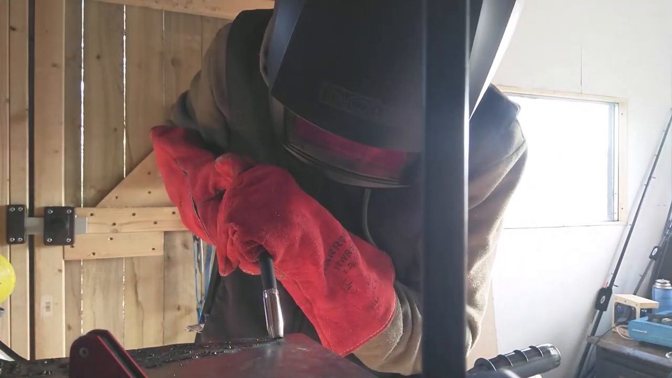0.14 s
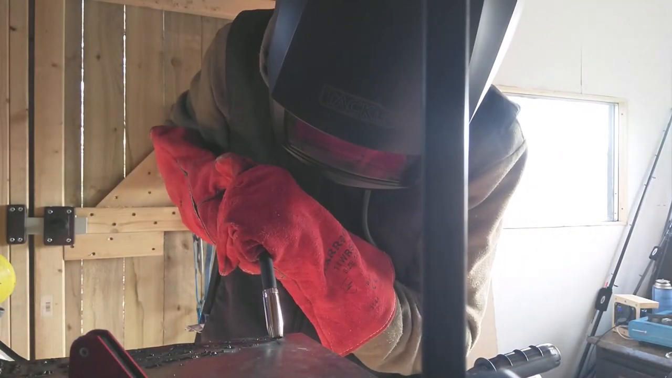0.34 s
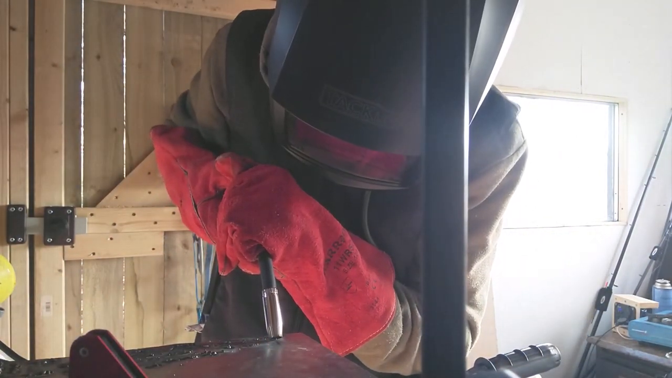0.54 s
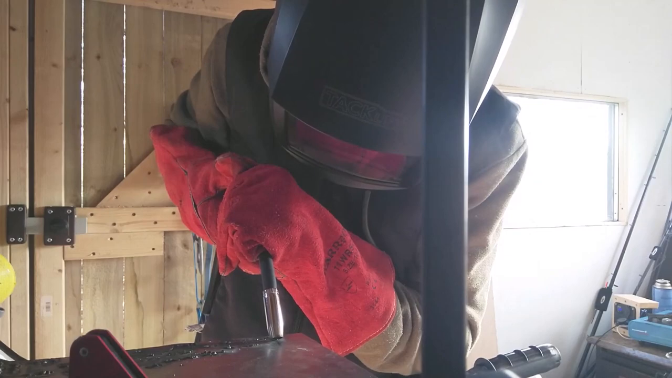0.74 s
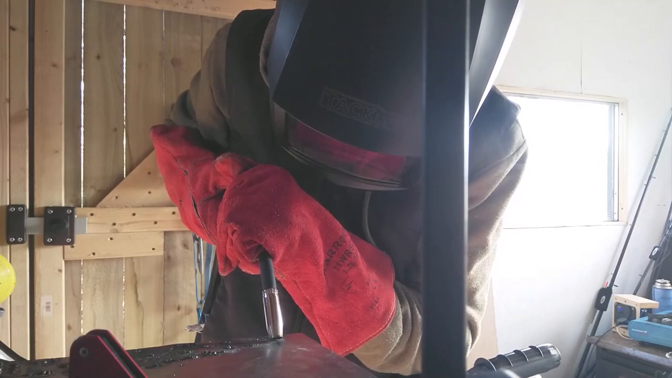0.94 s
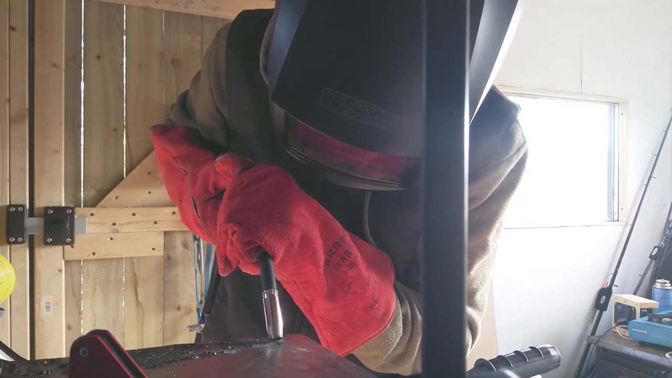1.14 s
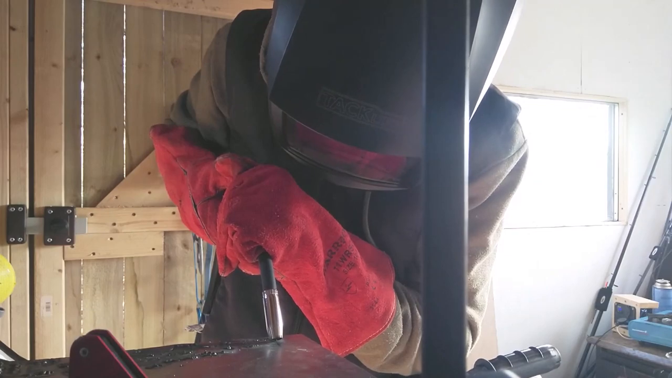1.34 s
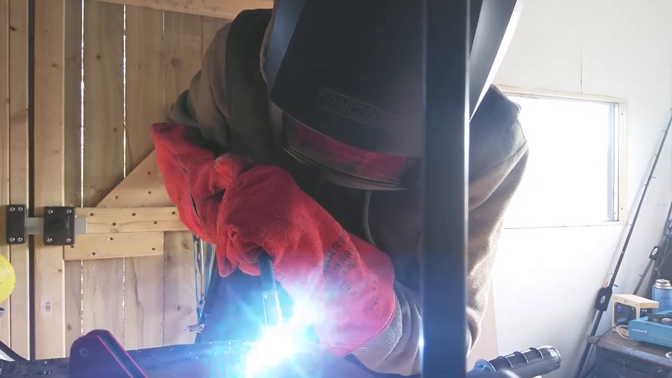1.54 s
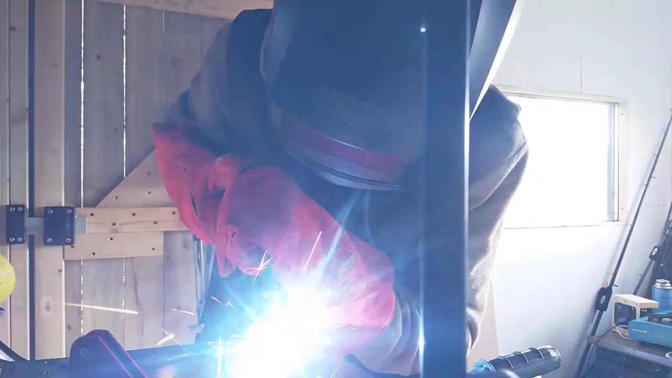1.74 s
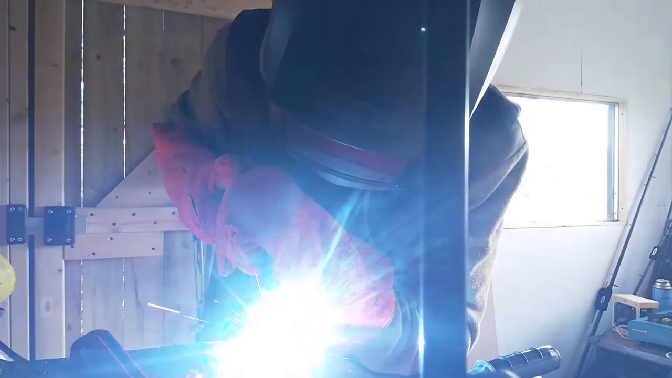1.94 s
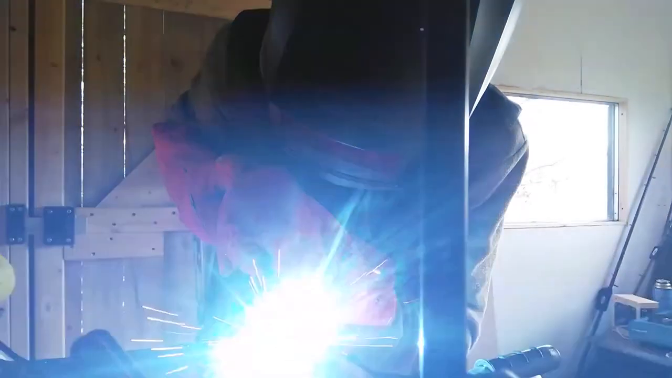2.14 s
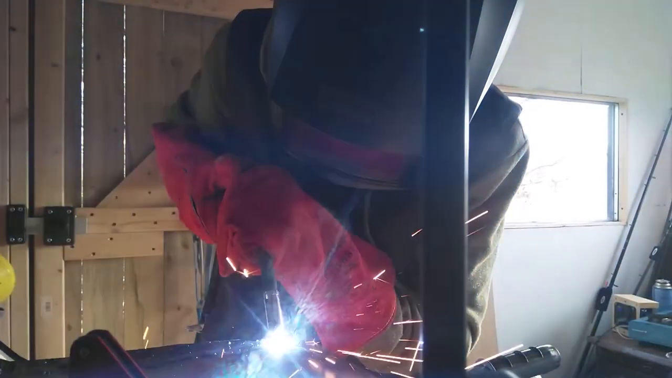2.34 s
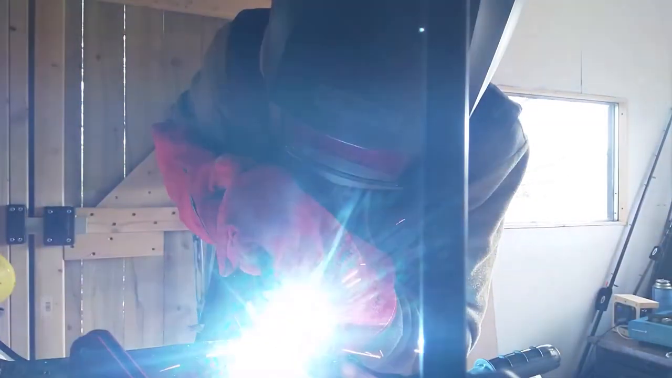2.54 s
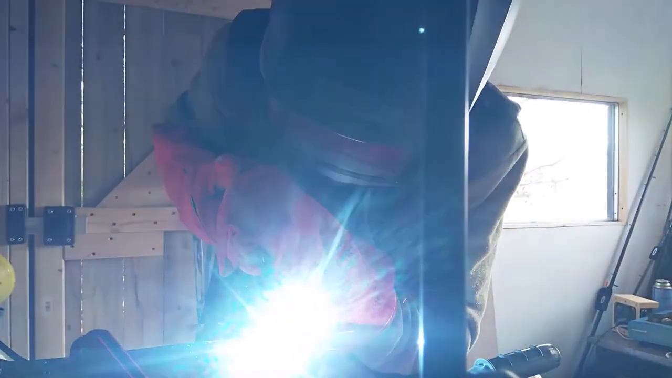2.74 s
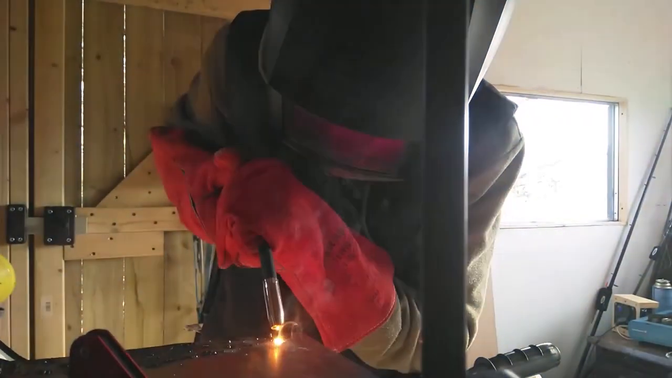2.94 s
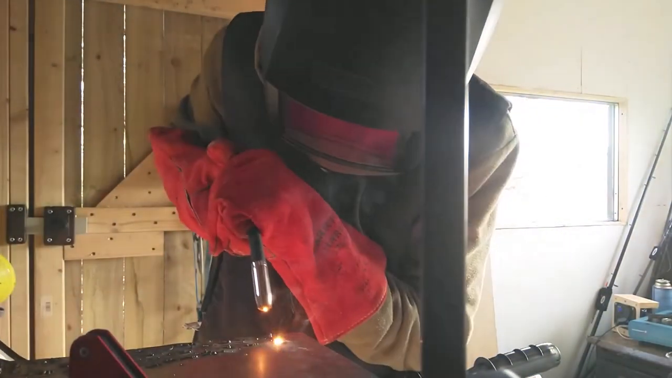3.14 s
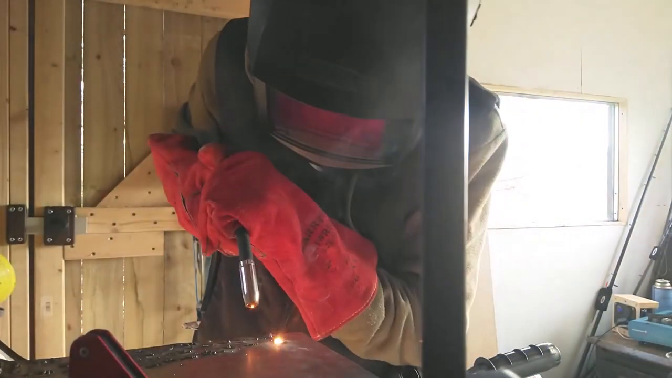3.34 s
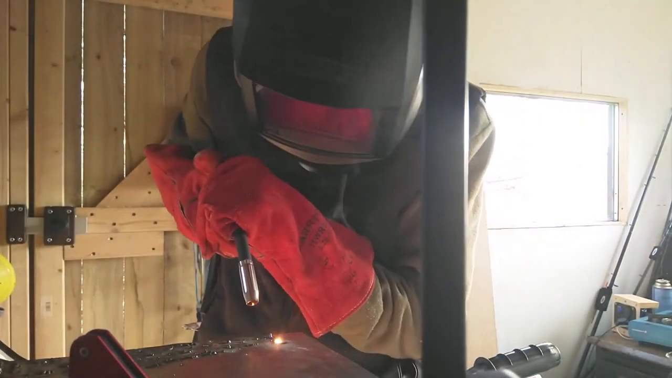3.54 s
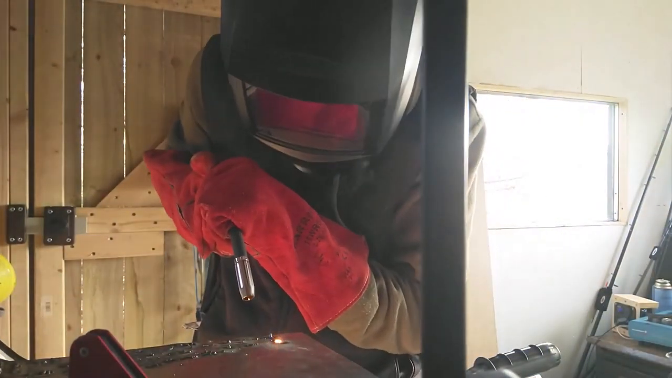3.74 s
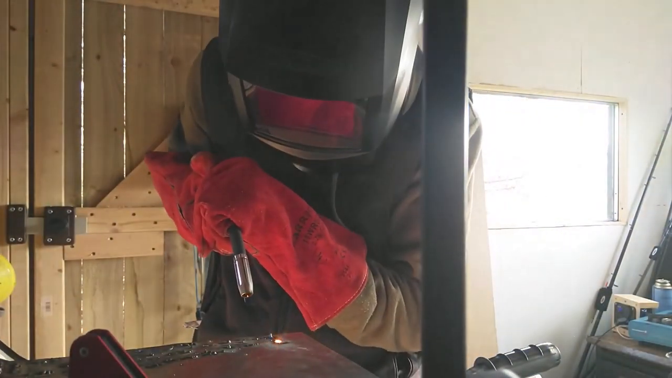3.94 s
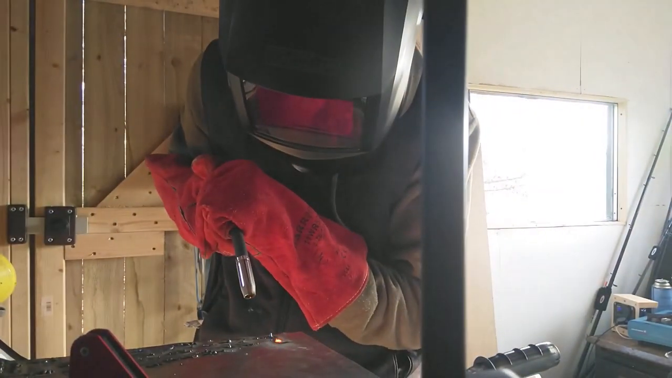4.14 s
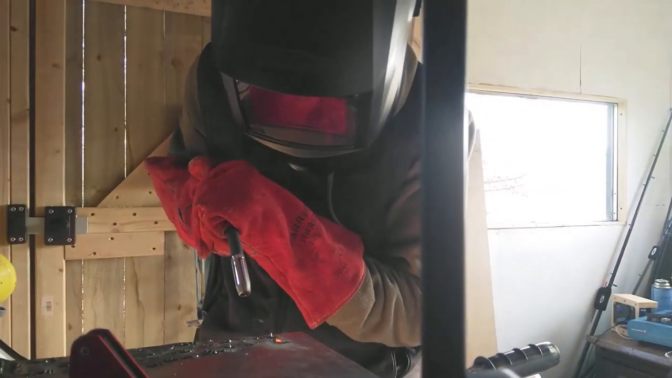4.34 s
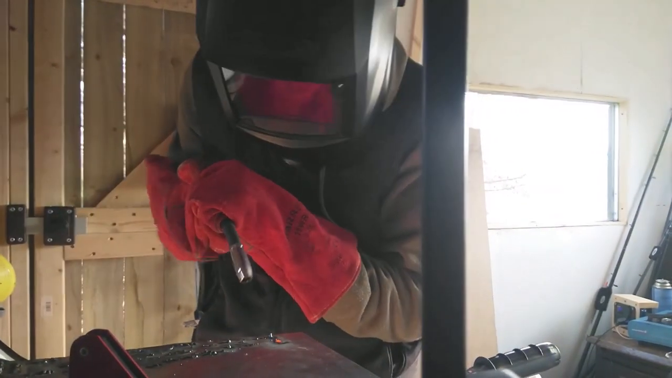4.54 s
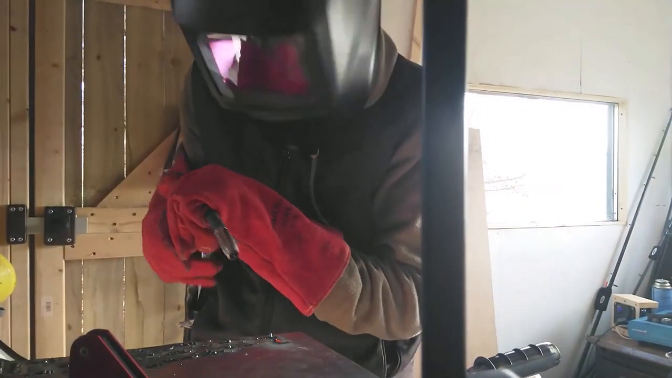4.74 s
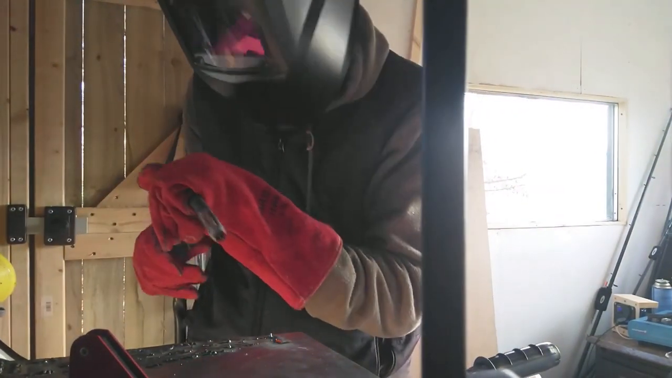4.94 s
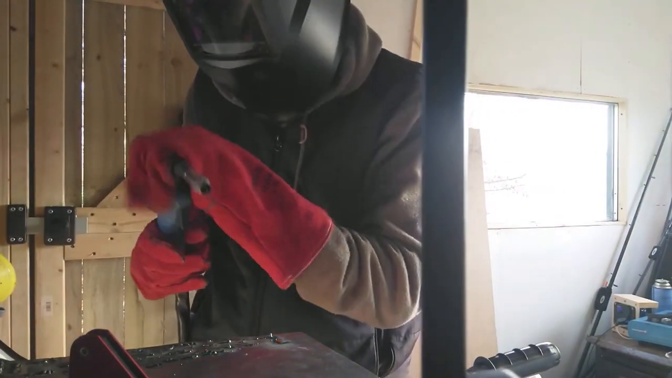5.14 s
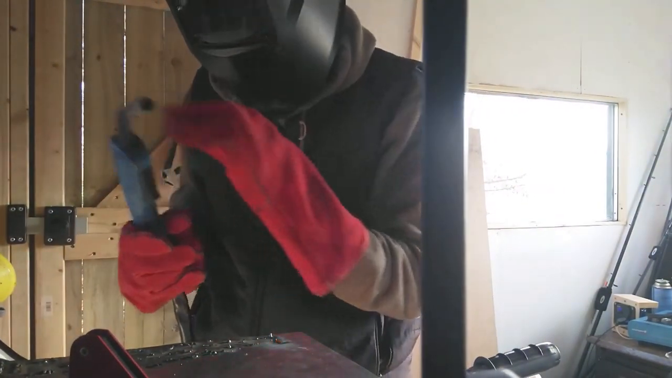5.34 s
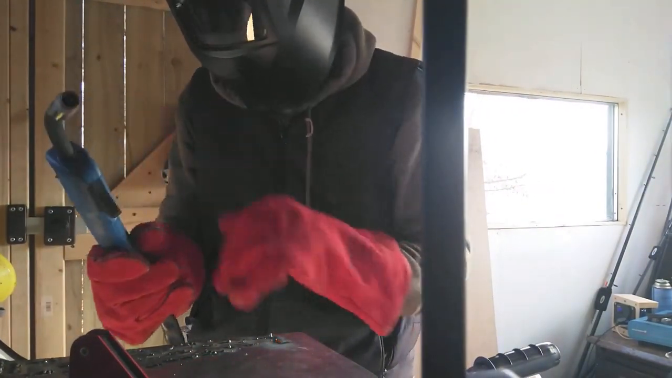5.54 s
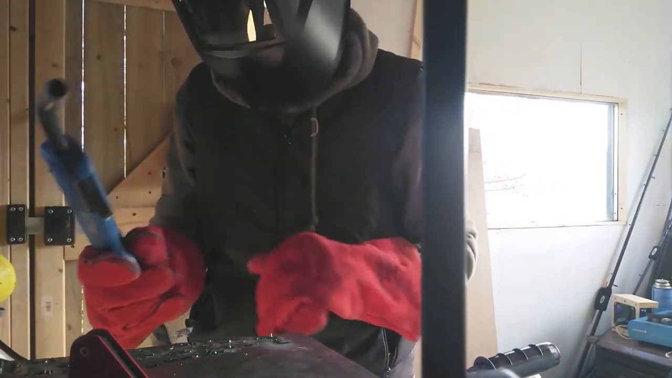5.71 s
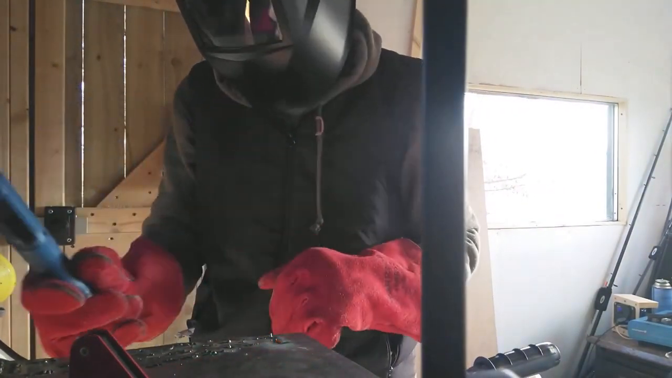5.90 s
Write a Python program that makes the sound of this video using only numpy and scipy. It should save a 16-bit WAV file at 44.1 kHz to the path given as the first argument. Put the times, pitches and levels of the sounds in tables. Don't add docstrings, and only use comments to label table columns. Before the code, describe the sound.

Near-silent room tone with low floor rumble and faint hiss; light, dull metallic taps come first. After a small plastic click, a wire-feed welder spits bright, dense, ragged crackle with hard pops, far louder than everything else and slightly different left and right. It cuts off into a brief small-room decay. A tiny click and soft knock follow, then quiet, then subdued leather rubbing and cloth swishes as the welder moves.

```python
import sys
import numpy as np
from scipy import signal
from scipy.fft import rfft, irfft
from scipy.io import wavfile

SR = 44100
rng = np.random.default_rng(int(sys.argv[2]) if len(sys.argv) > 2 else 0)


def magnitude_from_level(level_db):
    exponent = np.asarray(level_db, float) / 20
    return 10 ** exponent


def generate_wav(signal):
    frames = np.transpose(np.atleast_2d(signal))
    scaled = np.clip(frames, -1, 1) * 32767
    pcm = np.round(scaled).astype(np.int16)
    wavfile.write(sys.argv[1], SR, pcm)


N = 263277
HZ = np.maximum(np.arange(N // 2 + 1) * SR / N, 1)

# [t/s, peak level/dB]
FIRST_SPARKS = [
    (1.596, -49),
    (1.604, -41.5),
    (1.608, -40.5),
    (1.617, -39),
    (1.622, -35.5),
    (1.629, -22),
    (1.636, -27),
]
# [t/s,
# level/dB]
FLARES = [(1.6539, -17), (1.6629, -15), (1.7126, -17), (1.7251, -12), (1.7435, -14.5), (1.7611, -22),
          (1.7814, -25.5), (1.7935, -17.4), (1.815, -20), (1.8387, -27), (1.8434, -20.1),
          (1.8532, -17), (1.8644, -15), (1.8775, -13), (1.8949, -16), (1.911, -19), (1.9225, -16),
          (1.9332, -19), (1.9444, -13.5), (1.9543, -13), (1.9642, -15), (1.9757, -14), (1.9835, -15),
          (1.9944, -20.5), (2.014, -21), (2.0258, -18), (2.0363, -15.5), (2.0452, -14.5),
          (2.0653, -14), (2.0731, -16.5), (2.0839, -13.5), (2.0955, -11.5), (2.1127, -15.5),
          (2.1427, -14), (2.1538, -13.5), (2.1654, -16), (2.1759, -19), (2.1857, -21.5),
          (2.2051, -20.5), (2.2251, -15), (2.2341, -20), (2.2522, -18.5), (2.2622, -21.5),
          (2.2722, -23.5), (2.2836, -17), (2.2934, -23), (2.3064, -26.5), (2.3144, -24), (2.3358, -20),
               (2.345, -19.5), (2.3549, -17.5), (2.3659, -17), (2.3763, -15.5), (2.4066, -18),
               (2.4228, -23.5), (2.4339, -22), (2.462, -21), (2.4739, -21.5), (2.4869, -20.5), (2.501, -17),
               (2.5232, -19), (2.5353, -12.5), (2.5444, -15.5), (2.5557, -16.5), (2.5844, -13),
               (2.5958, -14), (2.605, -15.5), (2.6138, -17.5), (2.6341, -24.5), (2.6443, -22),
               (2.6742, -15), (2.6837, -16), (2.6936, -15.5), (2.706, -14.5), (2.7352, -15.5),
               (2.744, -19.5), (2.7537, -14), (2.7654, -16.1), (2.7759, -16.5), (2.7861, -17.5),
               (2.7939, -17), (2.8038, -19.5), (2.8263, -20.5), (2.8353, -17.5), (2.8443, -18.5),
               (2.8547, -22.5), (2.8727, -21.5), (2.8837, -24.5), (2.9046, -22.5),
          (1.674, -25.5), (1.714, -17), (1.685, -29), (1.734, -20), (1.754, -23), (1.885, -19.5),
                (1.904, -18.5), (2.004, -26), (2.055, -17), (2.104, -18), (2.124, -24.5), (2.134, -24.5),
                (2.272, -25.5), (2.415, -22), (2.565, -20.5), (2.624, -23), (2.716, -20.5), (2.815, -22.5),
                (2.915, -26)]
FLARE_DECAY_S = 0.0034
SNAP_DB, SNAP_DECAY_S = 14, 0.00025
# [t/s, level/dB]
HEAT = [
    (1.58, -62),
    (1.726, -30),
    (1.806, -39),
    (1.882, -16),
    (2.026, -29),
    (2.704, -28),
    (2.764, -15),
    (2.806, -29.5),
    (2.94, -73),
]
# [f/Hz, level/dB per Hz]
ARC_SPECTRUM = [(90, -52.5), (150, -28.5), (280, -11.5), (650, -9), (1300, -3.5), (1900, -8.5),
                (2600, -7.5), (4300, -4), (6800, -7), (8800, -4.5), (10400, -6), (12500, -5.5),
                (14300, -4.5), (15700, -4.5)]
# [f/Hz, width/Hz, level/dB]
NOTCHES = [(2200, 200, -10), (3000, 120, -5), (3620, 200, -6), (5950, 200, -10), (4050, 150, -5),
           (9380, 350, -15), (13800, 900, -24), (15080, 150, -6)]
# [f/Hz, width/Hz, level/dB]
SHEET_LEFT = [(5090, 120, 8.5), (5333, 60, 5.5), (6860, 90, 11), (7260, 60, 4.5), (7680, 210, 8),
              (8150, 200, 7), (8450, 54, 4.5), (10500, 120, 4), (11300, 90, 8), (12350, 150, 4),
              (15200, 400, 2.5)]
SHEET_RIGHT = [(4790, 180, 8.5), (5260, 150, 2.8), (5390, 60, 7), (6470, 260, 3), (7070, 70, 5),
               (8478, 80, 5), (12000, 120, 13), (12390, 80, 7.8), (15300, 200, 4)]
ROAR_DB, ROAR_FOLLOWS_HEAT, ROAR_SAG_DB_PER_S, ROAR_LINGER_S = -20.5, 0.55, 7, 0.03
WELD_START_S, WELD_END_S = 1.66, 3.12

# [t/s, right jump level/dB, early inverted left jump level/dB, left lead/ms,
# left jump level/dB]
SHORTS = [(1.6552, -0.5, -10.5, -2.5, -10), (1.6632, 0, -29.5, 0.98, 1.5), (1.7663, -1.5, -5.5, 2.3, -7),
          (1.7955, -3.5, -11, 0.4, -4), (1.8184, -4, -5.5, 2.13, -2), (1.9964, -1, -5, 1.94, -8.5),
          (2.168, -0.5, -25, 0.65, -4), (2.1872, -1.5, -24, 0.85, -5), (2.2958, -5, -45, 1.3, -11),
          (2.317, -9.5, -23, -1.3, -15), (2.338, 0, -5.5, -0.35, -7), (2.357, -2.5, -17, 0.25, -7.5),
          (2.3681, -3.5, -32, -0.2, -7.5), (2.3788, -6.5, -34, 0.9, -10.5), (2.4154, -0.9, -5.5, -.1, -6.5),
          (2.425, -9.5, -22.5, -0.2, -11), (2.436, -3.5, -2, 3.1, -7), (2.6074, -6, -26, -0.3, -9.5),
          (2.6157, -2, -24.5, -0.5, -6), (2.635, -2.5, -18.5, 0.8, -9.5), (2.6769, -5, -17.5, 0.45, -10),
          (2.6853, -11.5, -19.5, 0.6, -15.5), (2.7785, -0.7, -21, 0.5, -5.5),
          (2.7888, -8.5, -14.5, 1.2, -12), (2.7959, -3, -12, -0.15, -6.5), (2.806, -2.5, -5.5, 1.9, -10),
          (2.8465, -0.1, -14.5, 2.55, -0.6), (2.8567, -6, -10, 0.1, -12.5), (2.8742, -6.5, -13, -1.86, -13)]
# [f/Hz, width/Hz, level/dB]
BENCH = [(168, 58, -13), (221, 54, 4), (94, 62, -1.5)]
SHARED_BASS_HZ = 260

# [t/s, peak level/dB, rise/s, decay/s]
TRIGGER_PULL = [
    (1.478, -51.5, 0.004, 0.0026),
    (1.481, -37, .004, .003),
    (1.485, -27.5, 0.006, 0.0012),
    (1.49, -33.5, 0.004, 0.0022),
    (1.496, -37.5, .002, 0.0023),
    (1.567, -59, .002, .004),
]
# [t/s, peak level/dB, rise/s, decay/s]
RELAY_DROP = [
    (3.008, -46.5, 0.0059, 0.013),
]
# [t/s, peak level/dB, rise/s, decay/s]
TICKS = [
    (1.13, -72, .001, 0.0033),
    (1.226, -57.5, .0005, 0.00093),
    (4.32, -71, .001, 0.0016),
    (4.457, -60.5, 0.0015, 0.0028),
    (4.469, -65, .001, .002),
    (5.165, -62, 0.00089, 0.0035),
]
# [f/Hz, level/dB per Hz]
TRIGGER_SPECTRUM = [(410, -62.5), (700, -34), (969, -11.5), (1310, -18.5), (1720, -2), (2030, -6.5),
                    (2470, -26.5), (2780, -4), (3660, -23.5), (5400, -3.5), (7480, -16.5), (8740, -7),
                    (11000, -12.5), (12400, -11.5), (15700, -20.5)]
RELAY_SPECTRUM = [(530, -34), (900, 2), (967, -0.5), (1380, -27), (2370, -13), (3480, -17), (5040, -7.5),
                  (6180, -22), (7040, -8.5), (9060, -21), (10600, -2), (11500, -15.5), (15700, -27.5)]

# [t/s, peak level/dB, brightness/dB per octave, contact time/s,
# share of ring left by the hand/1]
KNOCKS = [(.127, -44, 1, 0.0022, .97), (.134, -40.5, 0.8, .006, 0.91), (.142, -42.5, 4, 0.0065, 0.97),
          (.153, -47.5, 3.5, 0.0034, 0.99), (.408, -64, -13, .006, .75), (.466, -65, -7, 0.0045, 0.66),
          (.578, -63, -6, 0.0035, 0.61), (.587, -65, 11, .005, 0.47), (.598, -66.5, 11.5, 0.0044, 0.45),
          (.722, -55, -7, 0.0036, 0.56), (.733, -61.5, 3.5, .004, 0.85), (.75, -55.5, -2, .004, 0.8),
          (.775, -56.5, -17, 0.0046, 0.81), (.927, -49, -9, 0.0035, .7), (.939, -57, 0, .004, 0.42),
          (3.069, -46.5, -19, 0.0025, .4), (4.543, -50, -1.5, .002, 0.35)]
# [f/Hz, level/dB, t60/s]
FRAME_MODES = [(462, 3, .11), (506, -4, .09), (700, -15, .07), (899, -3, .26), (953, -8, .15),
               (1100, -19, .05), (1443, -12, .12), (1529, -17, .12), (1715, -18, .18), (1950, -20, .1),
               (2290, -20, .12), (2360, -19, .14)]
BENCH_MODES = [(275, -11, .1), (403, -1, .13), (620, -16, .05), (1160, -22, .05)]
# [f/Hz, level/dB per Hz]
SLAP_SPECTRUM = [(120, -44), (200, -47), (467, -7.5), (789, -19), (912, 6), (1330, -29), (1490, -10),
                 (2550, -26), (4980, -22.5), (15000, -31.5)]
FRAME_PAN_DB, ROUGH_CONTACT, HIGH_MODE_LOSS_DB = 0.7, 0.5, 16

# [start t/s, end t/s, level/dB, rise/dB per s, fall/dB per s]
RUBS = [
    (4.462, 4.53, -73, 900, 300),
    (4.546, 4.68, -54, 1200, 60),
    (4.842, 4.86, -51, 220, 98),
    (4.955, 4.98, -48.5, 900, 327),
    (5.18, 5.3, -57, 500, 50),
    (5.356, 5.554, -51.5, 77.5, 59),
    (5.65, 5.97, -59, 100, 100),
    (5.0, 5.16, -71, 100, 100),
]
# [start t/s, end t/s, level/dB, rise/dB per s, fall/dB per s]
SWISHES = [
    (4.462, 4.47, -85, 1103, 60),
    (4.63, 4.72, -53.5, 132, 135),
    (4.886, 4.94, -50.5, 244, 200),
    (4.965, 4.98, -49.5, 200, 397),
    (5.27, 5.33, -57.5, 65, 300),
    (5.54, 5.56, -53, 48.5, 79),
    (5.65, 5.9, -62, 101, 72),
    (5.0, 5.16, -75, 103, 99.5),
]
# [f/Hz, level/dB per Hz]
LEATHER_SPECTRUM = [(160, -47), (280, -36.5), (302, -12.5), (506, 2), (681, -6.5), (886, 1.5), (978, -5.5),
                    (1120, 1), (1450, -15.5), (2000, -13), (2600, -24), (4400, -120)]
CLOTH_SPECTRUM = [(820, -12.5), (1400, -0.5), (1620, -8.5), (2680, -4.5), (2990, -4), (4400, -5.5),
                  (4940, -3.5), (8000, -8.5), (10400, -12.5), (17600, -120)]
SHEEN_DB, SHEEN_FOLLOWS_CLOTH = 6, 1.19

# [start t/s, end t/s, level/dB, rise/dB per s, fall/dB per s]
RUNDOWN = [
    (2.96, 3.075, -54, 196, 76),
    (3.3, 3.55, -68.5, 38, 67),
]
# [f/Hz, level/dB per Hz]
RUNDOWN_SPECTRUM = [(88, -57.5), (150, -26), (177, -17.5), (225, 2), (303, -11.5), (490, 1.5), (609, -15.5),
                    (1170, -19), (2200, -36.5), (9000, -58)]
# [t/s, rumble peak level/dB]
SHIFTS = [(.27, -54.5), (.73, -52.5), (.93, -57), (1.18, -57.5), (1.579, -52.5), (3.19, -56.5),
          (3.54, -53.5), (4.1, -60), (4.55, -56), (4.75, -50.5), (5.14, -49.5), (5.67, -52.5),
          (5.97, -61.5)]
SHIFT_DB_PER_S, RUMBLE_DB, SINK_DB, RETURN_S = 61, -58, 11, 0.049
SHAKE_DB, SHAKE_RISE_DB_PER_S, SHAKE_FALL_DB_PER_S = -33, 500, 451.5
# [f/Hz, level/dB per Hz]
RUMBLE_SPECTRUM = [(8.8, -68.5), (15, -41.5), (42, -1.5), (59, 2), (125, -8), (151, -22), (205, -21.5),
                   (228, -23), (250, -24), (320, -53.5), (550, -120)]
AIR_SPECTRUM = [(100, -41), (170, -19.5), (235, -3), (259, -7.5), (362, -6), (466, -9.5), (1030, -12),
                (3000, -23.5), (3900, -51.5), (6600, -120)]
HISS_SPECTRUM = [(880, -32), (1500, -12.5), (2220, -8.5), (2420, -6.5), (3590, -0.5), (5410, -1),
                 (7930, -4), (8840, -8.5), (15600, -10.5)]
AIR_DB, HISS_DB = -72, -74.5
# [f/Hz, correlation/1]
LIKENESS = [(60, 0.99), (180, 0.99), (550, 0.27), (1650, -0.01), (4970, -0.14), (15000, 0.072)]
# [f/Hz, t60/s]
SHED_T60 = [(100, 0.57), (500, 0.41), (2000, 0.18), (8000, 0.18), (16000, 0.25)]


def arc():
    s, db = flares()
    throb_db = 3 * np.cos(2 * np.pi * 100 * (np.arange(N) / SR - 0.006))
    sizzle = magnitude_from_level(in_time(HEAT)[0] - 9.0 + throb_db + 0.6 * drift(22))
    both = 0
    for spot, (lag, shift) in enumerate([(16, 1), (14, 0.99), (18, 1.008), (13, 0.997)]):
        spot_s, spot_db = s[spot::4], db[spot::4]
        flare = swell(spot_s, spot_db + 7.0, rise_s=0.0005, tau_s=FLARE_DECAY_S)
        snap = fade(marks(spot_s, magnitude_from_level(spot_db + SNAP_DB)), SNAP_DECAY_S)
        spits = flare * crackle(spread_db=4.0) + snap * np.sign(crackle(spread_db=0))
        raw = colour(spits + sizzle * crackle(spread_db=1.5), ARC_SPECTRUM)[0]
        sparks = peaks(raw, NOTCHES, shift)
        both = both + np.array([sparks, np.roll(sparks, lag)]) + magnitude_from_level(-2.5) * shed(sparks)
    rung = np.array([peaks(both[0], SHEET_LEFT), peaks(both[1], SHEET_RIGHT)])
    return magnitude_from_level(-2.5) * rung + roar()


def flares():
    return np.transpose(sorted(map(tuple, FIRST_SPARKS + FLARES)))


def roar():
    heat_db, = in_time(HEAT)
    since_start = np.arange(N) / SR - WELD_START_S
    level_db = ROAR_DB + ROAR_FOLLOWS_HEAT * heat_db - ROAR_SAG_DB_PER_S * since_start
    level = fade(magnitude_from_level(level_db) * (heat_db > -100), ROAR_LINGER_S) / (ROAR_LINGER_S * SR)
    return level * magnitude_from_level(3.6 * drift(18)) * diffuse(AIR_SPECTRUM)


def thumps():
    t = np.arange(-300, 600) / SR
    sag = -0.4 * np.exp(np.minimum(t, 0) / 0.0008) * (t < 0)
    rise = 1 - np.exp(-np.maximum(t, 0) / 0.0001)
    fall = (1.26 * np.exp(-t / 0.00059) - 0.12 * np.exp(-t / 0.0085)) * (t >= 0)
    shape = sag + rise * fall

    def jumps(seconds, db):
        return np.convolve(marks(seconds, magnitude_from_level(db)), shape)[300:300 + N]

    s, right_db, early_db, lead_ms, far_db = np.transpose(SHORTS)
    right = jumps(s - 0.0001, right_db)
    early = jumps(s - 0.0021, early_db)
    far = jumps(s - lead_ms / 1000, far_db + 1.5)
    dull = signal.lfilter(*signal.butter(1, 1500, fs=SR), far)
    inverted = magnitude_from_level(-1.0) * early + magnitude_from_level(-8.0) * np.roll(far, 85)
    left = dull - signal.lfilter(*signal.butter(1, 250, "high", fs=SR), inverted)
    left = left + 0.72 * signal.filtfilt(*signal.butter(2, SHARED_BASS_HZ, fs=SR), right - left)
    return peaks(np.array([left, right]) + magnitude_from_level(-18.5) * shed(right), BENCH)


def clicks(table, spectrum):
    rattle = sum(swell([s], db + 3.0, rise_s, tau_s) for s, db, rise_s, tau_s in table)
    out = colour(rattle * crackle(spread_db=4.5), spectrum)[0]
    return out + magnitude_from_level(0.5) * shed(out)


def knocks():
    out, t = np.zeros((2, N)), np.arange(SR // 3) / SR
    hz, level_db, t60 = np.transpose(FRAME_MODES + BENCH_MODES)[:, :, None]
    pan_db = FRAME_PAN_DB * np.array([[0.5], [-0.5]])
    for s, db, tilt_db, contact_s, ring in KNOCKS:
        push = rng.standard_normal(len(t)) * np.exp(-t / contact_s) * np.clip(t / 0.0016, 0, 1)
        own_db = rng.normal(0, 1.2, (2, len(hz), 1))
        bright_db = tilt_db * np.log2(np.minimum(hz, 1000) / 500)
        damped_db = HIGH_MODE_LOSS_DB * (1 - ring) * (hz > 1000)
        gain = magnitude_from_level(level_db + bright_db - damped_db + own_db)
        rings = np.sum(gain * magnitude_from_level(-60 * t / (t60 * ring)) * np.sin(2 * np.pi * hz * t), axis=1)
        rough = signal.oaconvolve(rings, [push / np.linalg.norm(push)], axes=1)[:, :len(t)]
        hit = rings * (1 - np.exp(-t / contact_s)) + ROUGH_CONTACT * rough
        scrape = rng.standard_normal((2, len(t))) * np.exp(-t / 0.029) * np.clip(t / 0.0047, 0, 1)
        slap = magnitude_from_level(-20.5 + 16.2 * ring + 0.21 * tilt_db) * colour(scrape, SLAP_SPECTRUM)[:, :len(t)]
        start = int(s * SR)
        out[:, start:start + len(t)] += (hit + slap) * magnitude_from_level(db + pan_db)
    return out + magnitude_from_level(-6.0) * shed(out.mean(axis=0))


def rustle():
    leather_db, cloth_db = strokes(RUBS), strokes(SWISHES)
    leather = magnitude_from_level(leather_db + 1.9 * drift(29) + 0.69 * drift(8.9)) * diffuse(LEATHER_SPECTRUM)
    cloth = magnitude_from_level(cloth_db + 0.85 * drift(30)) * diffuse(CLOTH_SPECTRUM)
    treble = signal.butter(2, 7000, "high", fs=SR, output="sos")
    sheen = signal.sosfilt(treble, diffuse([(7000, -5.0), (10000, -1.0), (16000, -6.5)]))
    return leather + cloth + magnitude_from_level(SHEEN_DB + SHEEN_FOLLOWS_CLOTH * cloth_db) * sheen


def background():
    rundown = magnitude_from_level(strokes(RUNDOWN) + 2.7 * drift(33)) * diffuse(RUNDOWN_SPECTRUM)
    air = magnitude_from_level(AIR_DB + 1.7 * drift(3.4)) * diffuse(AIR_SPECTRUM)
    return rumble() + rundown + air + magnitude_from_level(HISS_DB) * diffuse(HISS_SPECTRUM)


def rumble():
    t = np.arange(N) / SR
    shifts = [(s, s, db, SHIFT_DB_PER_S, SHIFT_DB_PER_S) for s, db in SHIFTS]
    steady_db = strokes(shifts + [(0, 9, RUMBLE_DB, 0, 0)])
    turns = [WELD_START_S - 0.03, WELD_START_S, WELD_END_S, WELD_END_S + RETURN_S]
    sink_db = SINK_DB * np.interp(t, turns, [0, 1, 1, 0])
    shakes_db = strokes([(s, s, db + SHAKE_DB, SHAKE_RISE_DB_PER_S, SHAKE_FALL_DB_PER_S)
                         for s, db, *_ in SHORTS])
    level = np.hypot(magnitude_from_level(steady_db - sink_db), magnitude_from_level(shakes_db))
    return level * magnitude_from_level(0.5 * drift(5.7)) * diffuse(RUMBLE_SPECTRUM)


def shed(x):
    t = np.arange(SR // 2) / SR
    response = 0
    for low in 40 * 2. ** np.arange(9):
        band = signal.butter(2, [low, min(2 * low, 20000)], "band", fs=SR, output="sos")
        t60 = at_hz(SHED_T60, 1.9 * low)
        alike = at_hz(LIKENESS, 0.41 * low)
        noise = signal.sosfilt(band, rng.standard_normal((2, len(t))))
        response = response + stereo(noise * magnitude_from_level(-60 * t / t60) / np.sqrt(t60), alike)
    response = response * np.clip(t / 0.0017, 0, 1)
    response = response / np.linalg.norm(response, axis=1, keepdims=True)
    return signal.oaconvolve([x], response, axes=1)[:, :N]


def diffuse(spectrum):
    both = stereo(rfft(rng.standard_normal((2, N))), at_hz(LIKENESS, HZ))
    return rms_one(irfft(both * magnitude_from_level(at_hz(spectrum, HZ)), N))


def stereo(pair, alike):
    mid, side = pair
    alike = np.clip(alike, -1, 1)
    return np.sqrt(1 + alike) * mid + np.sqrt(1 - alike) * side * [[1], [-1]]


def peaks(x, table, shift=1):
    for hz, width, db in table:
        r, w = np.exp(-np.pi * width / SR), 2 * np.pi * hz * shift / SR
        band = signal.lfilter([(1 - r * r) / 2, 0, (r * r - 1) / 2], [1, -2 * r * np.cos(w), r * r], x)
        x = x + (magnitude_from_level(db) - 1) * band
    return x


def colour(x, spectrum):
    cepstrum = irfft(at_hz(spectrum, np.linspace(1, SR / 2, 2049)) * np.log(10) / 20)
    cepstrum[1:2048] *= 2
    cepstrum[2049:] = 0
    taps = irfft(np.exp(rfft(cepstrum)))
    return signal.oaconvolve(np.atleast_2d(x), [taps / np.linalg.norm(taps)], axes=1)[:, :N]


def crackle(spread_db):
    return rms_one(rng.standard_normal(N) * magnitude_from_level(spread_db * np.minimum(rng.exponential(1, N), 5)))


def drift(rate):
    points = rng.standard_normal(int(N / SR * 100) + 100)
    r = np.exp(-2 * np.pi * rate / 100)
    slow = signal.lfilter([1], [1, -2 * r, r * r], points)[98:]
    return np.interp(np.arange(N) / SR * 100, np.arange(len(slow)), rms_one(slow))


def swell(s, db, rise_s, tau_s):
    return fade(fade(marks(s, magnitude_from_level(db)), tau_s), rise_s) / max(rise_s * SR, 4.4)


def fade(x, tau_s):
    return signal.lfilter([1], [1, -np.exp(-1 / (max(tau_s, 1e-4) * SR))], x + 1e-18)


def marks(seconds, heights):
    out = np.zeros(N)
    np.add.at(out, (np.asarray(seconds) * SR).astype(int), heights)
    return out


def strokes(rows):
    t = np.arange(0, N + 64, 64) / SR
    start, end, db, rise, fall = np.transpose(rows)[:, :, None]
    level_db = db - rise * np.maximum(start - t, 0) - fall * np.maximum(t - end, 0)
    power = magnitude_from_level(2 * np.maximum(level_db, -150))
    return np.interp(np.arange(N) / SR, t, 10 * np.log10(power.sum(axis=0)))


def in_time(rows):
    s, *columns = np.transpose(rows)
    t = np.arange(N) / SR
    return [np.interp(t, s, c, left=-150, right=c[-1] if s[-1] > 5 else -150) for c in columns]


def at_hz(points, hz):
    points = np.array(points)
    return np.interp(np.log(hz), np.log(points[:, 0]), points[:, 1])


def rms_one(x):
    return x / np.sqrt(np.mean(x ** 2) + 1e-20)


def scene():
    switches = (clicks(TRIGGER_PULL, TRIGGER_SPECTRUM) + clicks(RELAY_DROP, RELAY_SPECTRUM)
                + clicks(TICKS, HISS_SPECTRUM))
    return arc() + thumps() + switches + knocks() + rustle() + background()


def roll_off(x):
    return signal.sosfilt(signal.butter(12, 16970, fs=SR, output="sos"), x)


def record(dry):
    thin = signal.lfilter(*signal.butter(2, 32, "high", fs=SR), dry)
    rounded = 1.1 * np.tanh(thin / 1.1)
    top_loss_db = np.clip((HZ - 15690) / 7, 0, 60)
    finished = irfft(rfft(rounded) * magnitude_from_level(-top_loss_db), N)
    return roll_off(finished)


dry = scene()
out = record(dry)
generate_wav(out)
```